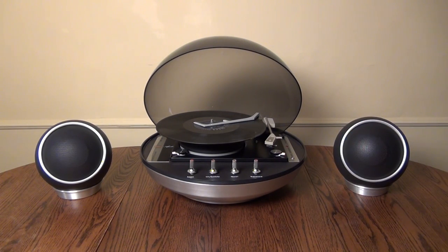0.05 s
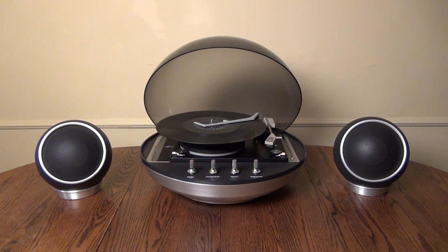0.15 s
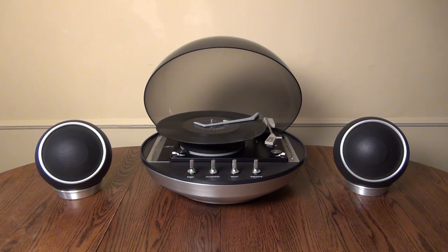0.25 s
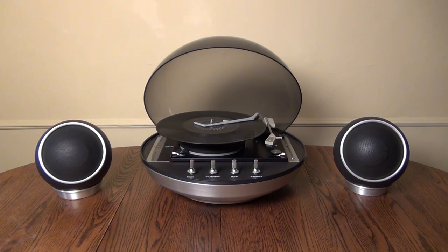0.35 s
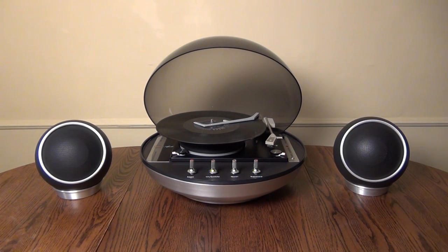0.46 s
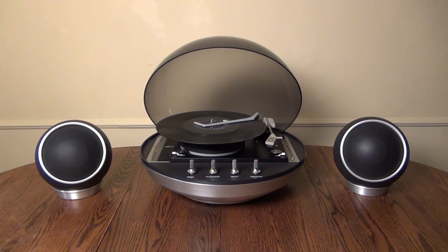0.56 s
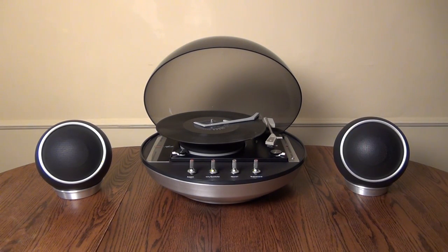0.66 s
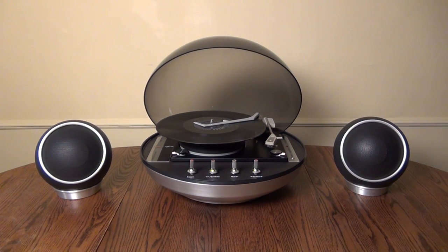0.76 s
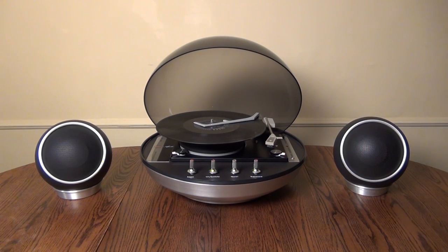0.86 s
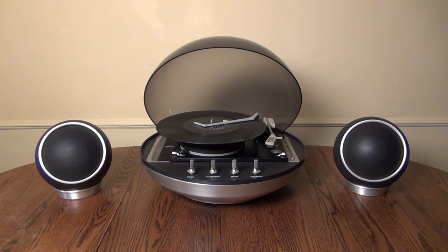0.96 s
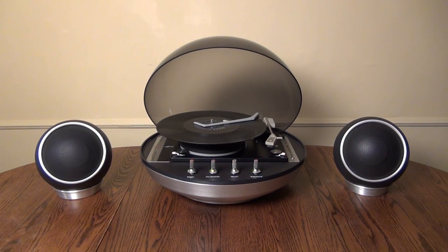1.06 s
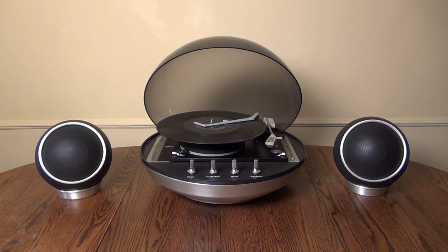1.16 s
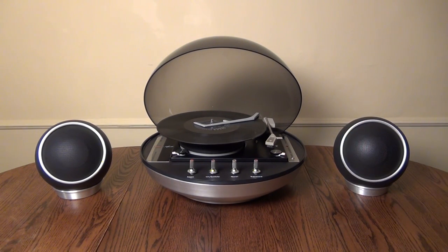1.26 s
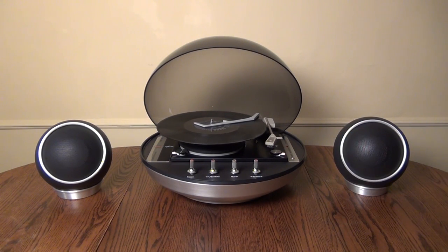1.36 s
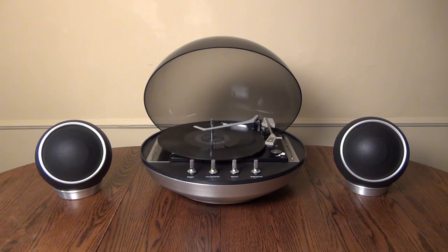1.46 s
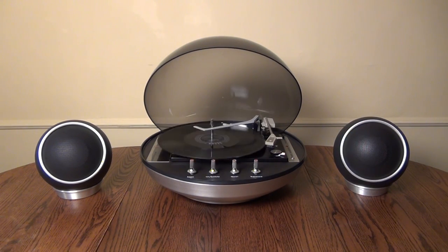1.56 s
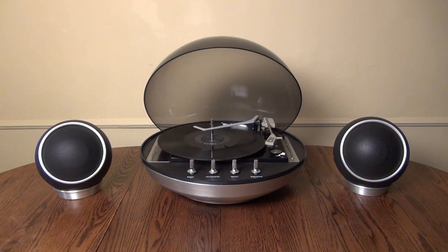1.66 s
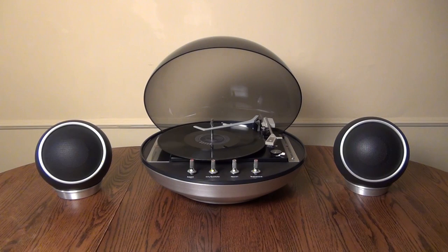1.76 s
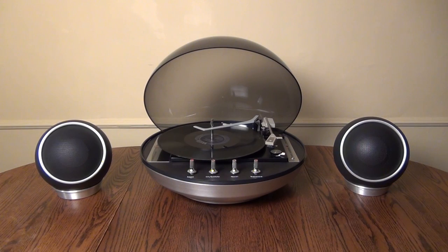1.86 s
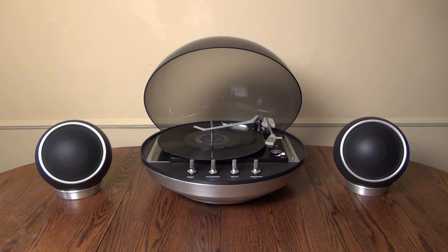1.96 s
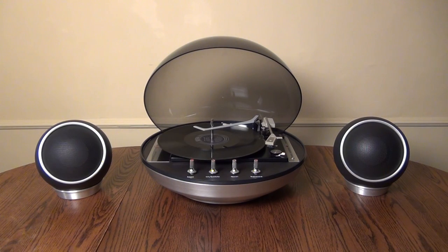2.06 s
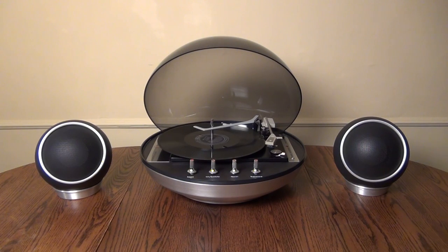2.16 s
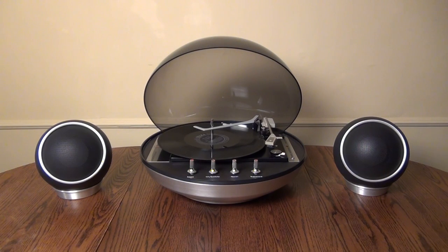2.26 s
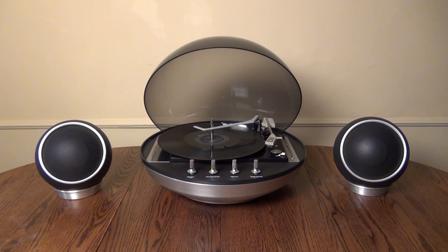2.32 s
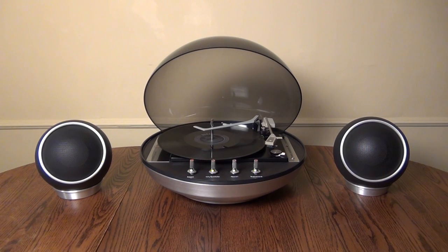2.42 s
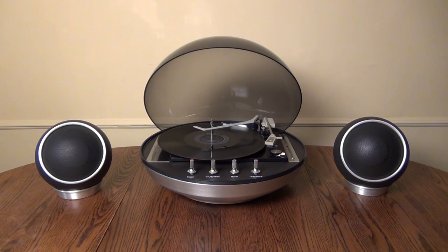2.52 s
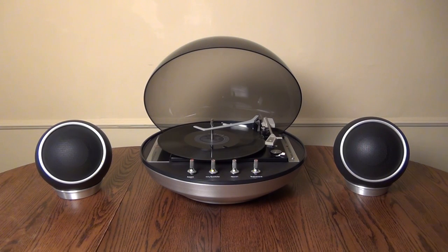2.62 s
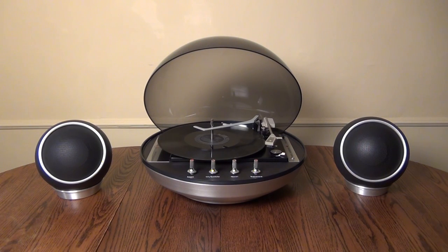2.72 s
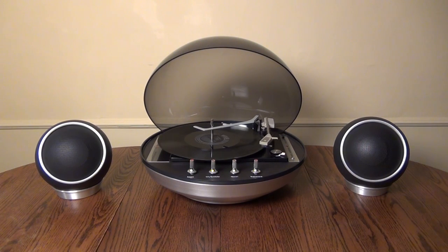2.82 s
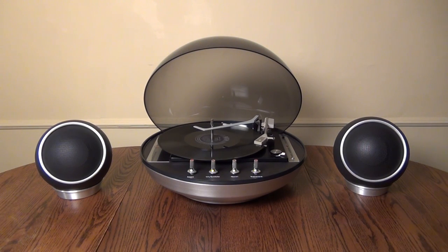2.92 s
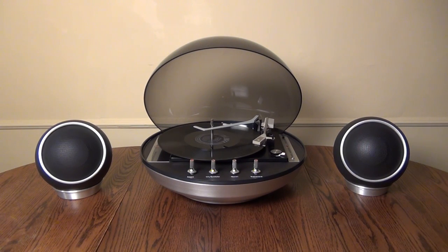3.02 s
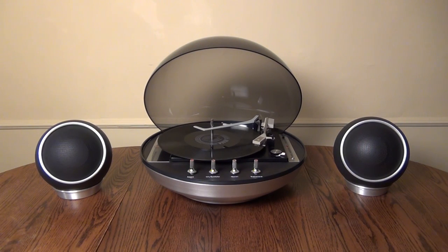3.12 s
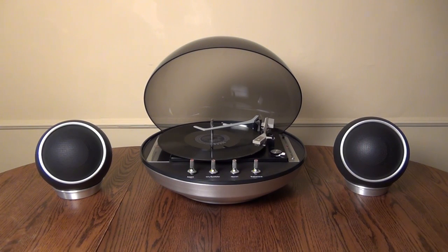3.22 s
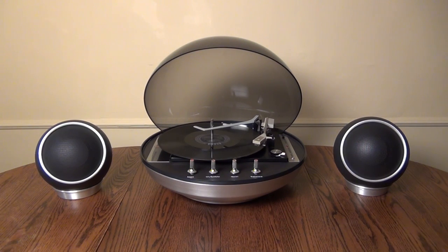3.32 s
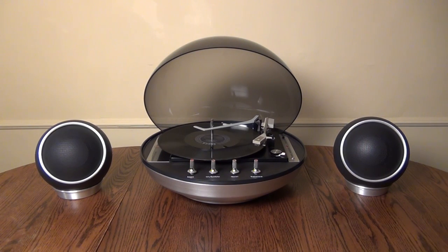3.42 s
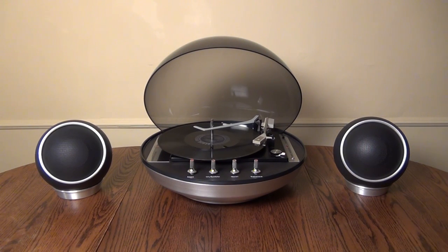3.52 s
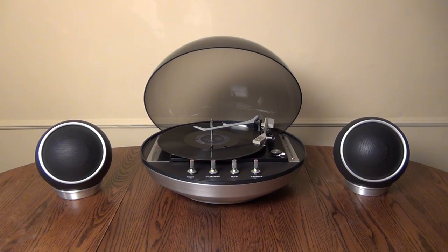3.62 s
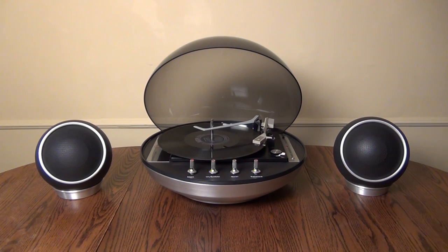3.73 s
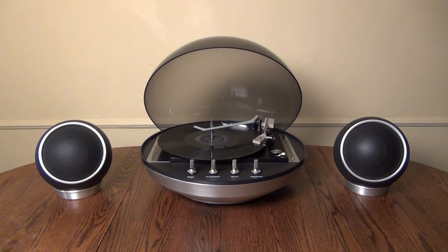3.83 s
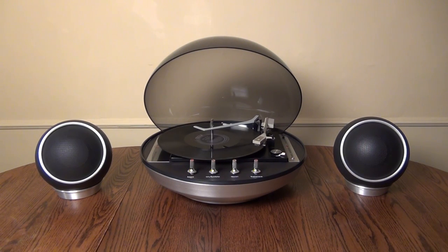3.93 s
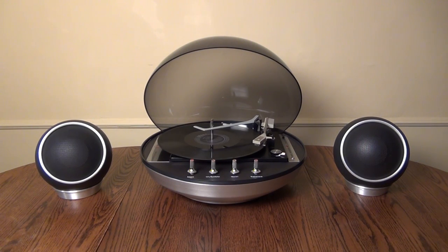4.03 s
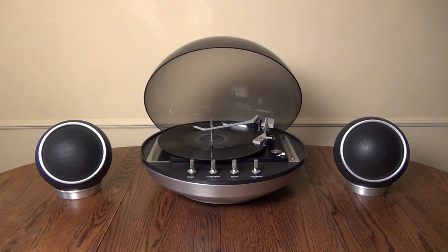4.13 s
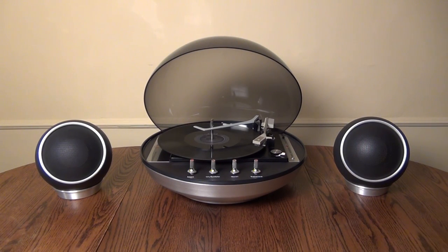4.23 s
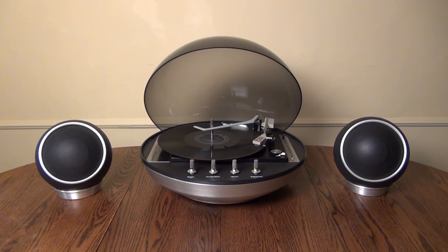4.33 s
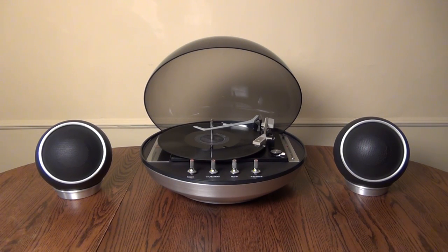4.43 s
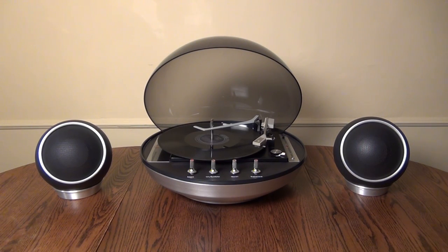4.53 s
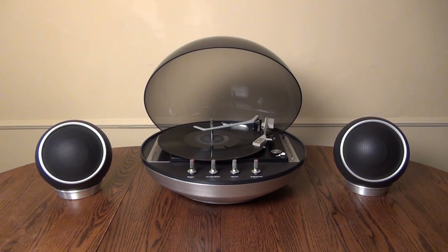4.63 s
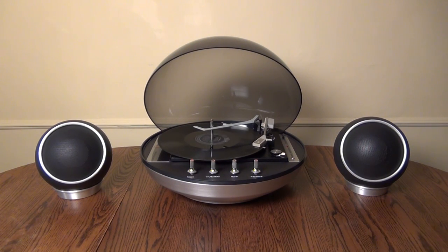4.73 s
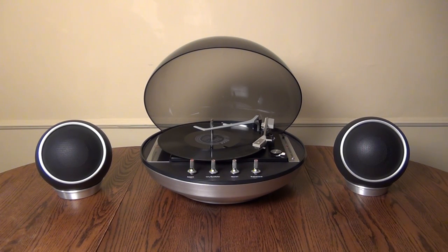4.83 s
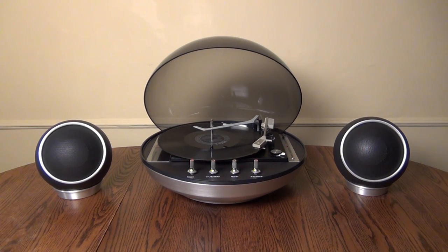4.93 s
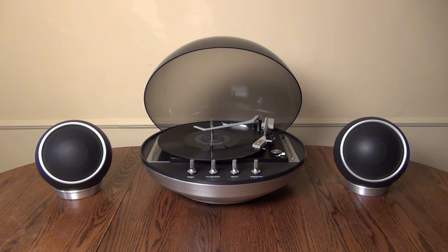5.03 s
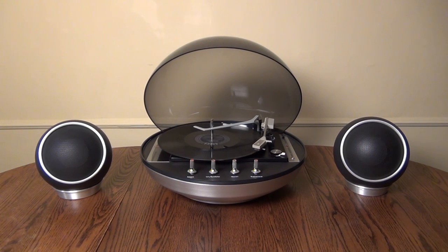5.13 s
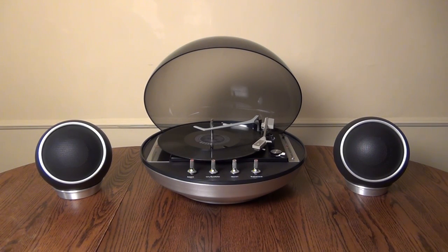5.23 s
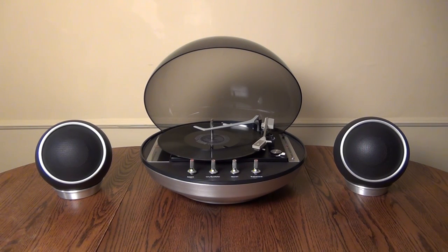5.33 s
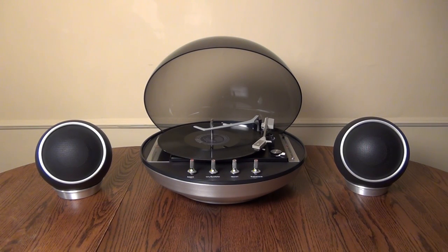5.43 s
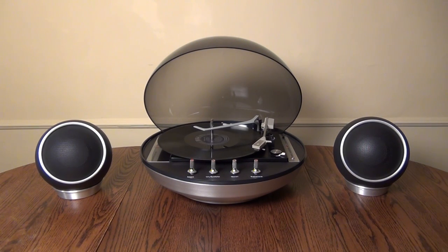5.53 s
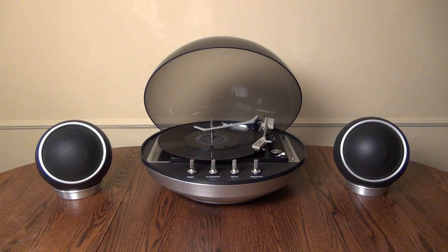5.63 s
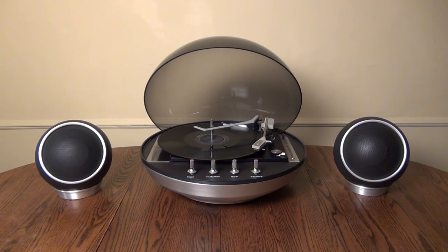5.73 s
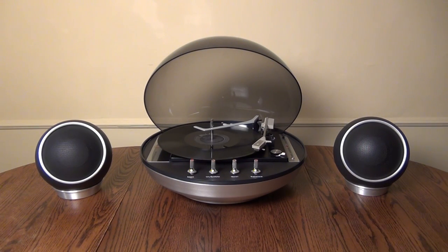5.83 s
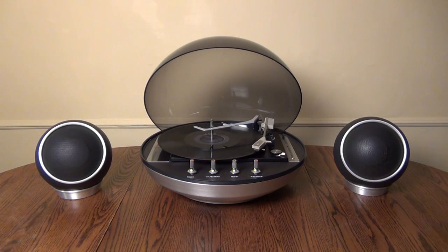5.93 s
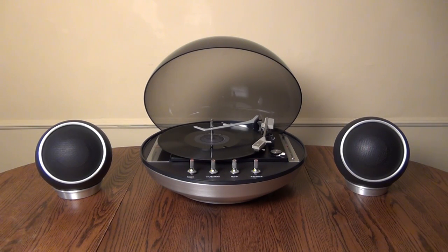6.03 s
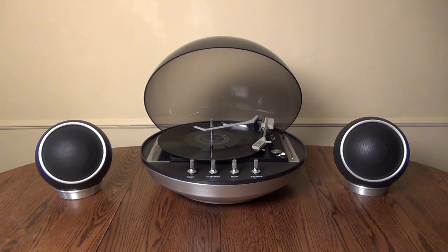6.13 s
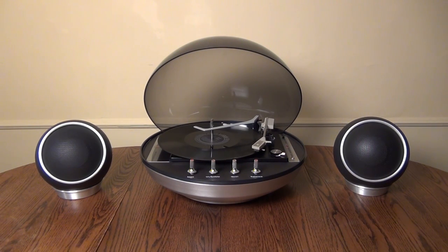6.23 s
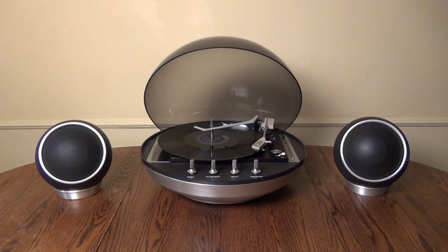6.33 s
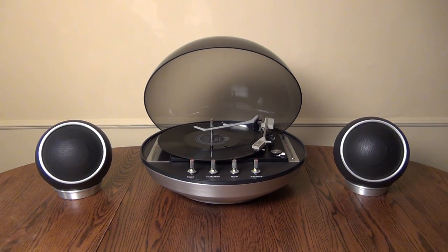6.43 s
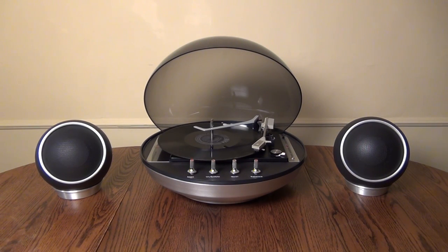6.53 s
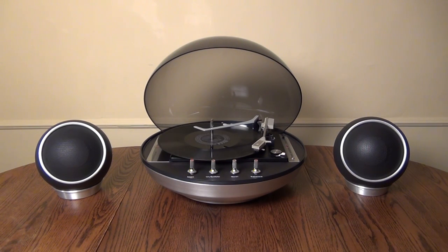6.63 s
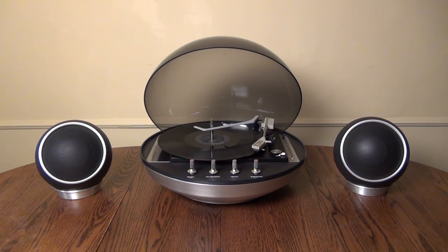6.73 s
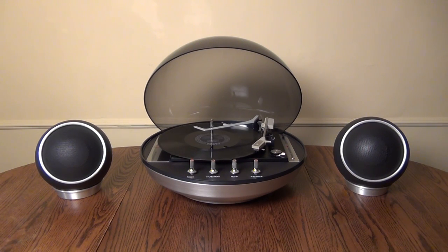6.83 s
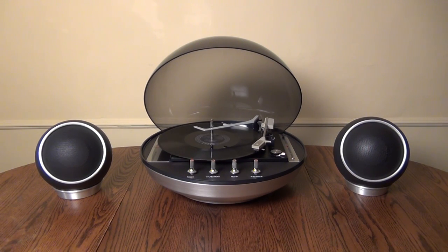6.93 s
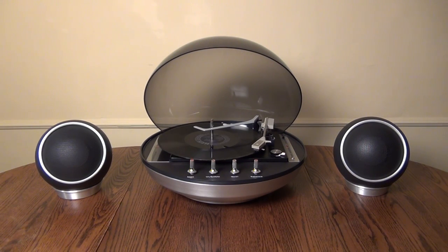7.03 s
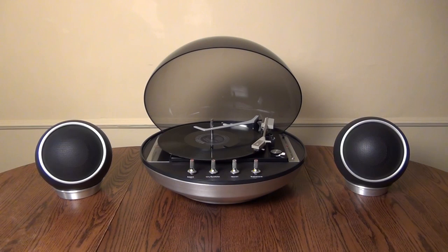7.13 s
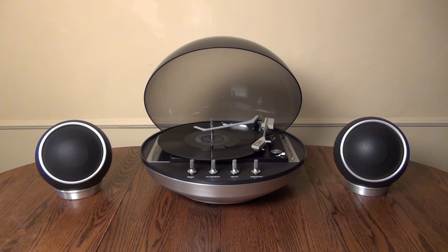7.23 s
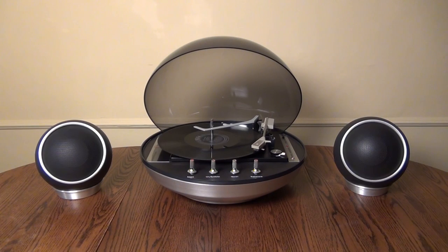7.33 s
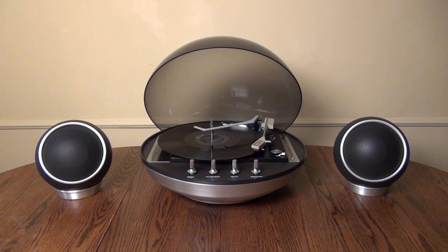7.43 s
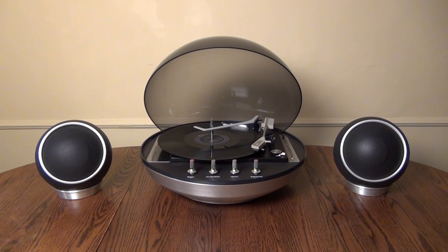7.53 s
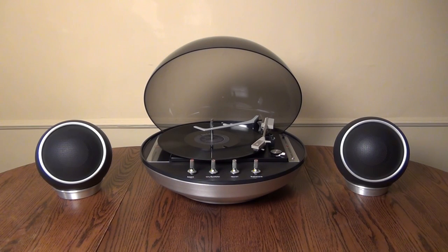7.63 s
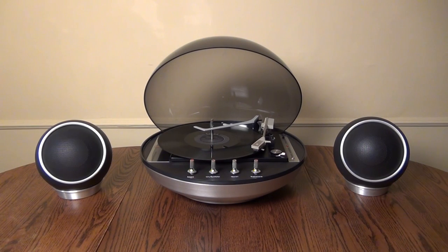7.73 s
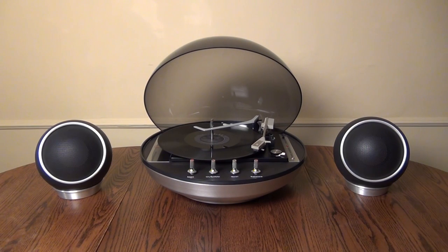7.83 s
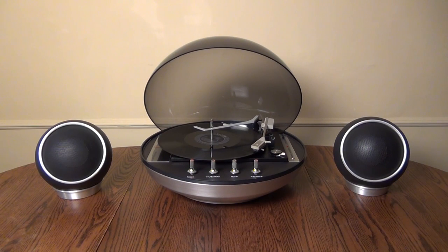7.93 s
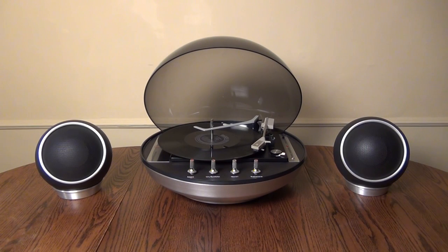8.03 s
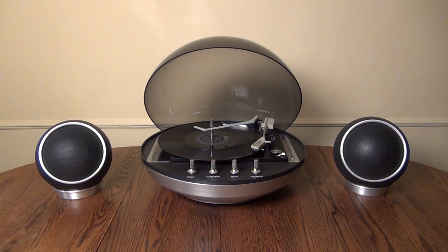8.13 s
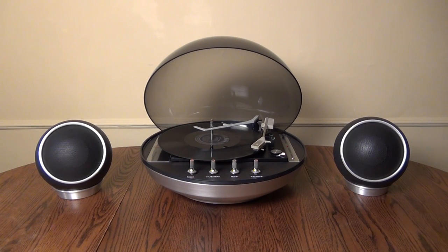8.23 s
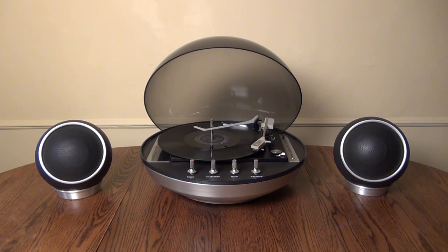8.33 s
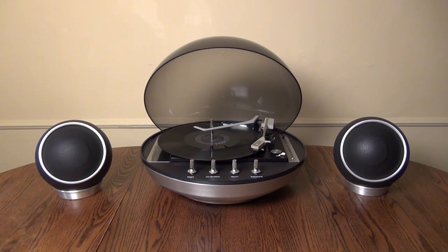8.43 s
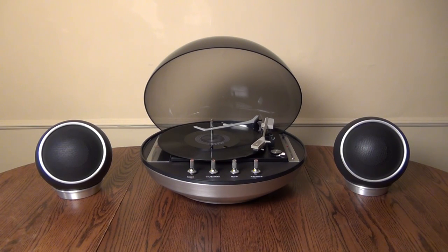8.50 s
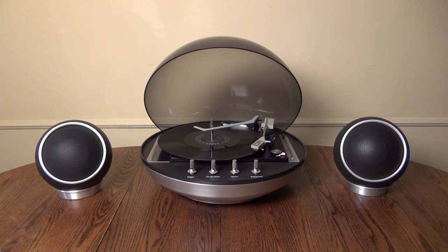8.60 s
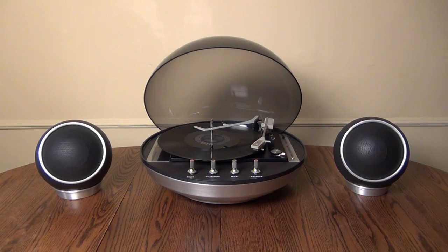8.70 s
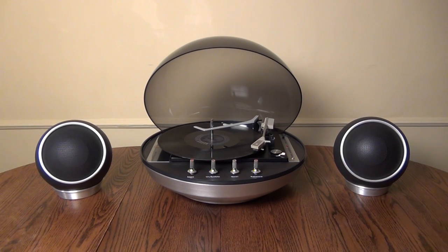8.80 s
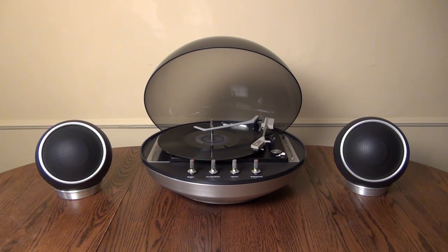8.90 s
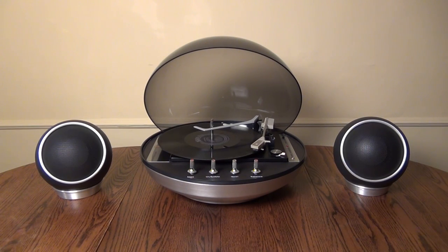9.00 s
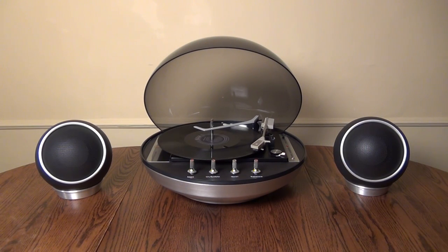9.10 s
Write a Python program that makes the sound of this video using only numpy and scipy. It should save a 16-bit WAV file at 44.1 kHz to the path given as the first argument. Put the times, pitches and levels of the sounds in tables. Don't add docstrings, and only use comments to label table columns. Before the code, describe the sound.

A record changer on a wooden table runs with a quiet, slightly wavering motor whine and soft bearing whirr throughout, close in a small furnished room, lightly stereo. A barely audible tick comes at 0.55 s. At 1.1 s a spindle latch snaps with a brief metallic rattle; from 1.35 s the disc touches, and around 1.45-1.7 s it falls and settles in a loud cluster of knocks, rattling and low table thud. Dry lever clacks follow, strongest near 2.55, 3.25 and 4.0 s, with fainter ticks between. Small bright catches click at 4.4 and 4.9 s. At 5.3 s the stylus lands with a soft thump and sharp crackle; at 5.65-5.75 s the cam releases in a hard, chattering clunk. Then patchy hiss, rumble and scattered pops play from small speakers, the surface noise gradually thinning, with a stronger pop near 9.1 s before the end at about 9.2 s.

```python
import sys
import numpy as np
from scipy import signal
from scipy.fft import rfft, irfft
from scipy.io import wavfile
from scipy.ndimage import uniform_filter1d

SR = 44100
rng = np.random.default_rng(int(sys.argv[2]) if len(sys.argv) > 2 else 0)


def store_wav(level_fs):
    pcm = np.round(np.clip(np.atleast_2d(level_fs), -1, 1) * 32767)
    wavfile.write(sys.argv[1], SR, pcm.T.astype(np.int16))


def gain_from_db(level_db):
    decades = np.asarray(level_db, float) / 20
    return 10 ** decades


N = 403956
TIME = np.arange(N) / SR
SLOW = np.arange(0, N, 32) / SR


def colour(x, rows, size=8192):
    hz, db = np.transpose(rows)[:2]
    bins = np.maximum(np.fft.rfftfreq(size, 1 / SR), 1)
    cepstrum = irfft(np.interp(np.log(bins), np.log(hz), db) * np.log(10) / 20)
    cepstrum[1:size // 2] *= 2
    h = irfft(np.exp(rfft(cepstrum[:size // 2], size)))[:size // 2]
    return signal.fftconvolve(x, h / np.sqrt(np.sum(h ** 2)))[:len(x)]


def ring(x, modes, longest):
    t = np.arange(SR // 2) / SR
    h = 0
    for k, (hz, db, t60) in enumerate(modes):
        decay = 1000 ** (-t / min(t60, longest))
        h = h + (-1) ** k * gain_from_db(db) * np.sin(2 * np.pi * hz * t) * decay
    return signal.fftconvolve(x, h / np.sqrt(np.sum(h ** 2)))[:len(x)]


def walk(rate):
    k = int(SR / rate)
    steps = np.repeat(rng.standard_normal(N // k + 1), k)
    return uniform_filter1d(uniform_filter1d(steps, k), k)[:N]


def grains(rate, spread_db):
    x = (rng.random(N) < rate / SR) * rng.standard_normal(N) * gain_from_db(spread_db * rng.exponential(size=N))
    return x / x.std()


def swell(start, attack, hold, db, dying):
    t = SLOW - start
    return np.clip(t / attack, 0, 1) ** 2 * gain_from_db(db - dying * np.maximum(t - attack - hold, 0))


def smooth(slow):
    return np.array([np.interp(TIME, SLOW, row) for row in slow])


# frequency in Hz, level in dB.
FLOOR_TONE = [(65, -50), (110, -23), (163, -15), (237, -11), (345, -6.5), (407, -9), (512, -13),
              (760, -8.5), (843, -10), (955, -12), (1710, -13), (2330, -22), (2930, -23.5), (4010, -27.5),
              (15800, -36)]
# frequency in Hz, side minus mid in dB.
FLOOR_SIDE = [(60, -20), (110, -27), (200, -63), (380, -31), (700, -19.5), (1290, -18.5), (2380, -16),
              (4400, -15), (8120, -21), (15000, -43)]


def floor():
    mid, side = (colour(rng.standard_normal(N), FLOOR_TONE) for _ in range(2))
    side = gain_from_db(-15.5) * colour(side, FLOOR_SIDE)
    sway = gain_from_db(0.6 * walk(6))
    return gain_from_db(-51) * sway * np.array([mid + side, mid - side])


# frequency in Hz, level in dB rms.
HUM = [(59.5, -53), (120, -70), (240, -60.5), (415, -63.5), (590, -68.5), (834.5, -52), (883, -68),
       (953, -63.5), (1055, -68), (1430, -69), (2950, -74), (3655, -76.5)]
# time in seconds, whine level in dB.
MOTOR_LOAD = [(0, -1.5), (.6, -1), (3.5, -0.5), (5, -1.1), (9.16, 0)]


def motor():
    turned = np.cumsum(1 + 0.00196 * walk(5)) / SR
    lines = 0
    for hz, db in HUM:
        flutter_db = np.clip(-0.25 * (db + 50), 0, 3) * walk(14)
        lines = lines + gain_from_db(db + flutter_db) * np.sin(2 * np.pi * (hz * turned + rng.random()))
    s, load_db = np.transpose(MOTOR_LOAD)
    return np.sqrt(2) * lines * gain_from_db(np.interp(TIME, s, load_db))


# octave centre in Hz, t60 in seconds, tail level in dB.
ROOM = [(127, 0.83, -4.5), (253, .3, 1.5), (500, 0.42, -1), (980, 0.23, 5), (2010, 0.26, -1.5),
        (3930, 0.29, -1.5), (8000, 0.35, -9), (14000, 0.29, -8.5)]
# frequency in Hz, side minus mid in dB.
ROOM_SIDE = [(60, 7.5), (110, -46), (200, -116), (380, -29.5), (700, -10), (1290, -4.5), (2380, -9.5),
             (4400, -7), (8120, -19), (15000, -26)]
# frequency in Hz, level in dB.
PORT_SIDE = [(60, -18), (110, -27), (200, -35), (380, -26), (700, -20), (1290, -14), (2380, -16),
             (4400, -17), (8120, -25), (15000, -33)]


def room(x, wet_db, side_db):
    t = np.arange(int(0.6 * SR)) / SR
    onset = np.clip((t - 0.002) / 0.00081, 0, 1)
    tails = 0
    for hz, t60, db in ROOM:
        band = signal.butter(2, [hz / np.sqrt(2), hz * np.sqrt(2)], "band", fs=SR, output="sos")
        decay = onset * 1000 ** (-t / t60)
        noise = signal.sosfilt(band, rng.standard_normal((2, len(t))))
        level = gain_from_db(np.array([[db], [-0.2 * db]]))
        tails = tails + level * noise * decay / np.sqrt(np.sum(decay ** 2))
    mid, side = (signal.fftconvolve(x, h)[:N] * gain_from_db(wet_db) for h in tails)
    side = gain_from_db(side_db) * colour(side, ROOM_SIDE)
    side = side + gain_from_db(-29) * colour(x, PORT_SIDE)
    return np.array([x + mid + side, x + mid - side])


# time in seconds, dirt in dB.
GROOVE_DIRT = [(5.285, -35), (5.6, -36), (5.85, -37), (6.5, -40), (7.2, -41.5), (7.6, -45), (8.4, -44.5),
               (9.16, -45.5)]
# middle in seconds, length in seconds, level in dB, extra rumble in dB.
SCUFFS = [(5.335, 0.065, 5, 9), (5.55, 0.076, 2, 1), (6.066, 0.076, -7, 4), (6.17, 0.041, 3.5, 6),
          (6.26, 0.086, 1.5, 1.5), (6.367, 0.084, -5, -0.5), (6.714, .06, 3, 2), (6.881, 0.16, 7, 3.5),
          (7.06, 0.043, 3.5, -1), (7.33, 0.056, -6.5, 1), (7.604, .12, -2.5, 2), (7.744, 0.055, 3, 0),
          (7.94, 0.14, 3, 2.5), (8.063, 0.099, -4.5, -4), (8.38, 0.1, 2.5, 0.5), (8.485, .06, 0.5, -5),
          (8.61, 0.12, 4, -0.5), (8.757, 0.05, 0, 3), (8.89, .05, -5, 3), (9.075, .05, -7, -1),
          (9.144, 0.05, -0.5, -3)]
# slope in dB per dB of dirt, offset in dB.
RUMBLE_LAW = (0.69, -15.5)
TREBLE_LAW = (1.077, -2)


def dirt():
    s, db = np.transpose(GROOVE_DIRT)
    level, heave = np.interp(SLOW, s, db), 0
    for middle, length, scuff_db, rumble_db in SCUFFS:
        patch = np.exp(-(2 * (SLOW - middle) / length) ** 2)
        level = level + scuff_db * patch
        heave = heave + rumble_db * patch
    rumble, treble = (slope * level + offset_db for slope, offset_db in (RUMBLE_LAW, TREBLE_LAW))
    landed = SLOW > s[0]
    return smooth(landed * gain_from_db(np.array([level, rumble + heave, treble])))


# time in seconds, peak in dB, width in dB.
SCRATCHES = [(5.2858, -32, 13), (5.3, -13, -3.5), (5.4216, -7.5, 6.5), (5.4895, -19, -2), (5.5154, -20, -9),
             (5.5631, -13.5, 0), (5.624, -18.5, -6), (5.9587, -22, -5), (6.0907, -20.5, 4),
             (6.1425, -21, 1), (6.1509, -16.5, 7), (6.2116, -19.5, -3), (6.2835, -20.5, 2),
             (6.4326, -15, -3), (6.7126, -17.5, -3), (6.766, -19, 1.5), (6.8297, -21.5, 1),
             (6.8673, -17, 3), (7.0522, -18.5, 8.5), (7.0844, -18.5, 10), (7.1668, -15.5, -6),
             (7.2501, -16, -2.5), (7.38, -23, 4), (7.735, -20.5, -6), (7.866, -21, -6), (8.096, -24, 1),
             (8.395, -20.5, -5.5), (8.8372, -17, 2.5), (8.9967, -17, -1.5), (9.1019, -8.5, 8)]
# time in seconds, peak in dB.
SPECKS = [(5.5278, -18), (5.6086, -21), (5.8614, -28), (6.008, -20), (6.132, -24), (6.2165, -21),
          (6.27, -21), (6.4078, -35), (6.9, -22), (7.0344, -24), (7.2152, -25), (7.3028, -30),
          (7.4935, -29), (7.7904, -23), (7.8183, -23), (7.9683, -24), (7.9903, -26.5), (8.042, -30),
          (8.12, -37), (8.1699, -28), (8.2825, -27), (8.311, -29), (8.4348, -26), (8.7037, -24),
          (8.8032, -28.5), (8.848, -24), (8.9215, -24), (8.9396, -23.5), (8.966, -22.5), (9.136, -26)]
# time in seconds, peak in dB.
MOTES = [(5.2914, -25), (5.4136, -23), (5.5233, -23), (5.9319, -28), (6.0776, -33), (6.1175, -33),
         (6.3749, -30), (6.4158, -29), (6.7875, -28), (7.0244, -29), (7.1372, -31), (7.1914, -29),
         (7.2334, -28), (7.2534, -27), (7.2863, -31), (7.2954, -27), (7.3906, -31), (7.415, -33),
         (7.437, -30), (7.4454, -33), (7.5028, -29), (7.5433, -35), (7.5807, -37), (7.6645, -33),
         (7.7114, -34), (7.8999, -32), (8.1449, -34), (8.1579, -30), (8.2008, -30), (8.2192, -30),
         (8.2506, -30), (8.4741, -27), (8.528, -32), (8.5924, -30), (8.7839, -33), (8.8584, -35),
         (8.9418, -29), (8.9614, -31), (8.9924, -31), (9.0404, -29), (9.0984, -33), (9.1494, -31)]
# frequency in Hz, gain in dB.
SPEAKER = [(650, -35), (1100, -7.5), (1170, -31), (1270, -3.5), (1560, -9), (2230, -1.5), (2660, -14.5),
           (2930, -2.5), (3100, 3), (4500, -17.5), (5850, -47.5), (9900, -120)]
TWEETER = [(2530, -32.5), (4300, -12), (4500, -10), (5120, 1.5), (5820, -5.5), (6440, -2.5), (7210, -9.5),
           (8230, -7.5), (9050, -19), (9940, -17.5), (10600, -27), (11500, -37), (16000, -89)]
WOOFER = [(59, -42), (100, -20), (197, -7.5), (242, 4.5), (336, 4), (372, -3.5), (718, 2.5), (1170, -17.5),
          (1250, -12), (1500, -12), (1950, -20), (3300, -120)]


def groove():
    patchy_db, dust_db = 1.5, 1.5
    surface = gain_from_db(patchy_db * walk(40)) * grains(9000, 2.1) + gain_from_db(-7.5) * grains(350, 1.4 * dust_db)
    hiss, rumble, treble = dirt() * gain_from_db(np.array([[-3], [-6], [-2.5]]))
    middle = hiss * surface
    treble = treble * (surface + gain_from_db(-11) * grains(150, 2 * dust_db))
    bass = rumble * gain_from_db(patchy_db * walk(19)) * grains(3000, 1.2)
    delay = 0.0005
    speck_width_db = -5.5
    for s, peak_db, width_db in SCRATCHES + [(*row, speck_width_db) for row in SPECKS]:
        i = int((s + delay) * SR)
        spread = 1 + int(max(width_db, 0))
        middle[i:i + spread] -= gain_from_db(peak_db + 0.37 * width_db + 11.5) / spread
        bass[i] -= gain_from_db(peak_db + 0.99 * width_db - 3)
        treble[i] -= gain_from_db(peak_db - 0.95 * width_db + 2.0)
    for s, peak_db in MOTES:
        i = int((s + delay) * SR)
        treble[i] -= gain_from_db(peak_db + 9)
        middle[i] -= gain_from_db(peak_db + 3)
    treble = treble + 0.19 * np.roll(treble, int(0.001106 * SR))
    return colour(middle, SPEAKER) + colour(treble, TWEETER) + colour(bass, WOOFER)


# start in seconds, level in dB, length of the push in ms.
THUDS = [
    (1.346, -45, 25),
    (1.5, -27.5, 38),
    (1.575, -24, 50),
    (4.901, -58, 13),
    (5.305, -43, 13),
    (5.337, -23.5, 10.7),
    (5.648, -29, 4.8),
    (5.69, -31, 20.4),
    (5.862, -38.5, 24),
    (6.861, -42, 30),
]
# frequency in Hz, level in dB, t60 in seconds.
TABLE_TOP = [(123.4, -12, 0.75), (253, 4, 0.095), (298.3, 2.5, 0.17)]


def thuds():
    push = 0
    for s, db, ms in THUDS:
        push = push + gain_from_db(db) * (TIME > s) * np.exp(-np.maximum(TIME - s, 0) * 1000 / ms)
    return ring(rng.standard_normal(N) * push, TABLE_TOP, longest=0.54)


# start in seconds, attack in seconds, hold in seconds, level in dB, dying in dB per second.
RATTLES = [
    (1.111, 0.0067, 0.016, -21.5, 222),
    (1.449, .012, 0.007, -21.5, 600),
    (1.48, 0.0053, 0.02, -22, 300),
    (1.522, 0.019, 0.058, -18, 165),
]
# plinth, platter, spring and edge in dB.
RATTLE_SHARES = [
    (-11, -8, -0.5, 0.5),
    (-4, -5, -5, -3.5),
    (-5, -2, -2, -1),
    (-5, -1.5, -4, -5),
]
RATTLE_DYING = (0.99, 0.9, 1.1, 1.2)


def rattles(shake):
    faster = np.array(RATTLE_DYING)[:, None]
    gains = 0
    for (start, attack, hold, db, dying), shares in zip(RATTLES, RATTLE_SHARES):
        gains = gains + swell(start, attack, hold, db, dying * faster) * gain_from_db(np.array(shares))[:, None]
    return shake * gain_from_db(-4.5) * smooth(gains)


# start, attack and hold in seconds, level in dB, dying in dB per second.
CHATTER_SHAPE = (5.66, 0.007, 0.04, -19, 300)
# base, latch, spring and edge in dB.
CHATTER_SHARES = (-3.5, -3, 0.6, -5.5)
# start in seconds, level in dB.
CATCHES = [
    (5.6615, -20),
    (5.6845, -21),
    (5.7025, -21),
    (5.7795, -34),
]


def latch_chatter(shake):
    gain = gain_from_db(-3.5) * swell(*CHATTER_SHAPE)
    for s, db in CATCHES:
        gain = gain + swell(s, 0.001, 0.003, db, 900)
    return shake * smooth(gain * gain_from_db(np.array(CHATTER_SHARES) - 3.5)[:, None])


# time in seconds, base level in dB, deck level in dB.
BOUNCES = [(.5445, -24, -30), (1.118, -30, -8), (1.192, -40, -14), (1.346, -26, -11), (1.452, -7, -8),
           (1.488, -3, -5), (1.533, 1, -6), (1.573, 2, -5), (1.592, 4, -8), (1.618, 0, -9), (1.63, -2, -10),
           (1.651, -8, -1.5), (1.707, -5, -14), (5.651, -6, -30), (5.668, -1, -30), (5.682, -4, -30),
           (5.696, 3, -30), (5.722, 0, -30), (5.752, -8, -30)]


def bounces():
    blows = np.zeros((2, N))
    s, *db = np.transpose(BOUNCES)
    blows[:, (s * SR).astype(int)] = gain_from_db(np.array(db))
    return blows


# start in seconds, level in dB, hardness in dB, contact in ms.
CLACKS = [(.5492, -36, 5, 3.3), (1.5284, -16, 14, 5.5), (2.3325, -38.5, -13, 4.3),
          (2.3729, -24.5, 2.5, 2.5), (2.5516, -13.5, 0, 4.9), (3.0854, -24.5, -4, 4.3), (3.1075, -27, 0, 2),
          (3.2415, -31, 9, 12), (3.257, -10, -2, 3.2), (3.9015, -27, -5, 4.9), (3.989, -34, 18.5, 7.3),
          (3.9986, -10.5, -8, 3.7), (4.6578, -50, 6, 3.6)]
# start in seconds, level in dB, hardness in dB, contact in ms.
KNOCKS = [(.5425, -29, -5.5, 4.2), (1.3432, -32, -4, 3.5), (1.4384, -21, 0, 7.8), (1.455, -25, 8, 4),
          (1.4646, -19.5, 9, 2.7), (1.4865, -6.5, 8.5, 3), (1.6091, -13, 5, 1.7), (1.6444, -11, 9.5, 2.5),
          (2.817, -39, -9, 3.4), (3.0535, -25, -6, 3), (5.6615, -8.5, 11, 4.4)]
# start in seconds, level in dB, hardness in dB, contact in ms.
SNAPS = [
    (1.1074, -34, 4, 10),
    (1.1128, -21.5, 9.5, 3.3),
    (1.5048, -24, 8, 6.4),
    (3.0385, -48, -3, 4),
    (3.3038, -40, 2, 4),
    (4.4168, -24, -3.5, 3.6),
    (4.883, -25.5, 1.5, 2.7),
    (4.9886, -43.5, 4, 11),
    (5.0582, -43, -5, 4.6),
    (5.6451, -20, -4, 3.2),
]
# plinth, lever, spring and edge in dB.
CLACK_SHARES = (-21, 5, -13.5, -15.5)
KNOCK_SHARES = (-3, -7, -14, -18)
SNAP_SHARES = (-8, -6.5, -0.5, 1.5)
HARD_SHARES = (-0.61, 0.058, 0.52, 1.08)


def contacts():
    length = 8000
    push, blow = np.zeros((4, N + length)), np.zeros((2, N))
    t = np.arange(length) / SR
    tremble_s = np.array([[0.03], [0.025], [0.03], [0.022]])
    tremble = np.array([[0.3], [0.07], [0.25], [0.2]]) * np.exp(-t / tremble_s)
    for rows, shares in ((CLACKS, CLACK_SHARES), (KNOCKS, KNOCK_SHARES), (SNAPS, SNAP_SHARES)):
        for s, db, hard_db, ms in rows:
            contact = np.clip(ms, 0.2, 30) / 1000
            envelope = (np.exp(-t / contact) + tremble) * (1 - np.exp(-t / (0.15 * contact)))
            burst = rng.standard_normal((4, length)) * envelope
            force = gain_from_db(db + np.array(shares) + hard_db * np.array(HARD_SHARES) - 1.5)
            i = int(s * SR)
            push[:, i:i + length] += (force * gain_from_db(np.array([-4, -4, 0, 0])))[:, None] * burst
            if ms < 6:
                blow[:, i + int(0.0015 * SR)] += force[:2] * np.sqrt(contact * SR / 2)
    return push[:, :N], blow


ARM_CYCLE = 2.2, 4.2
# frequency in Hz, gain in dB.
PLINTH = [(71, -57), (120, -20), (240, -9.5), (294, 2), (504, -7.5), (605, -6.5), (873, 0.5), (1090, -10),
          (1200, -4.5), (1560, -24.5), (2640, -120)]
LEVER = [(700, -42), (1200, -13.5), (1600, -15), (1950, -2), (2260, -6), (2600, -12.5), (2900, -21),
         (3500, -16.5), (3800, -15), (4200, -31), (7000, -57)]
PLATTER = [(590, -37), (1000, -5.5), (1110, -11), (1470, 4), (1710, -2.5), (1970, 3.5), (3000, -12.5),
           (3900, -33), (6600, -120)]
SPRING = [(1650, -43), (2800, -2), (3050, -3.5), (3590, -1), (4560, -6.5), (5020, -1), (6300, -16.5),
          (8190, -25), (13900, -120)]
EDGE = [(3530, -30), (6000, -4), (7260, -4), (7970, 0), (9220, -7), (11600, -9.5), (12600, -15),
        (15800, -22)]
# frequency in Hz, level in dB, t60 in seconds.
PLINTH_RING = [(286, 1, 0.047), (332, -2.5, 0.16), (425, 3, 0.07), (588, 0, 0.056), (685, -6.5, 0.028),
               (930, -20, 0.018)]
LEVER_RING = [(1250, -7, .04), (1580, -11, .04), (1814, -9, .05), (1990, 0, .032), (2262, -1, .032),
              (2616, -11, .04), (3470, -13, .04), (3780, -14, .05)]
DECK_RING = [(720, -4, .08), (850, 0, .1), (892, -2, .12), (1310, -8, .06), (1495, -3, .06),
             (1620, -8, .06)]
BASE_RING = [(258, 0, 0.12), (315, 1, 0.1), (447, -1, 0.11), (520, 0, 0.036)]
LATCH_RING = [(1495, -3, 0.053), (2735, 3, 0.063), (2950, -2, 0.055), (5040, 1.5, .06), (5130, -3, 0.056),
              (6100, -3, 0.045), (7950, -0.5, 0.043)]


def mechanism():
    push, blow = contacts()
    shake = grains(3000, 1.3)
    rattle = rattles(shake)
    base, latch, coil, edge = latch_chatter(shake)
    base_bounce, deck_bounce = bounces()

    plinth = ring(push[0] + gain_from_db(-3) * blow[0], PLINTH_RING, longest=0.11)
    plinth = plinth + colour(rattle[0] + 0.5 * push[0] + 0.32 * base, PLINTH)

    riding = (TIME > ARM_CYCLE[0]) & (TIME < ARM_CYCLE[1])
    lever = colour(riding * push[1], LEVER) + ring(gain_from_db(-4.5) * riding * blow[1], LEVER_RING, longest=0.1)
    platter = colour(~riding * (push[1] + gain_from_db(-3) * blow[1]) + rattle[1] + 0.58 * latch, PLATTER)
    deck = ring(deck_bounce + gain_from_db(-7) * rattle[1], DECK_RING, longest=0.15)

    spring = colour(push[2] + rattle[2] + 0.71 * coil, SPRING)
    tick = colour(push[3] + rattle[3] + edge, EDGE)
    chatter = ring(gain_from_db(-4) * base + gain_from_db(1.5) * base_bounce, BASE_RING, longest=0.15)
    chatter = chatter + ring(latch + 0.23 * coil, LATCH_RING, longest=0.026)
    return plinth + lever + platter + deck + spring + tick + chatter


def scene():
    changer = room(mechanism() + thuds(), wet_db=-5.0, side_db=-14.5)
    speakers = room(groove(), wet_db=-4.0, side_db=-16.5)
    return changer + speakers + motor() + floor()


def band_limit(x):
    return signal.sosfilt(signal.butter(12, 16680, fs=SR, output="sos"), x)


def record(dry):
    cut = signal.sosfilt(signal.butter(5, 120, "high", fs=SR, output="sos"), dry)
    flicker = gain_from_db(-60) * signal.sosfilt(signal.butter(1, 60, fs=SR, output="sos"), rng.standard_normal(N))
    soft = 0.7 * np.tanh((cut + flicker) / 0.7)
    top = signal.ellip(8, 0.2, 60, 15800, fs=SR, output="sos")
    port_db = np.array([[0.12], [-0.12]])
    mix = signal.sosfilt(top, soft) * gain_from_db(port_db)
    return band_limit(mix)


dry = scene()
out = record(dry)
store_wav(out)
```